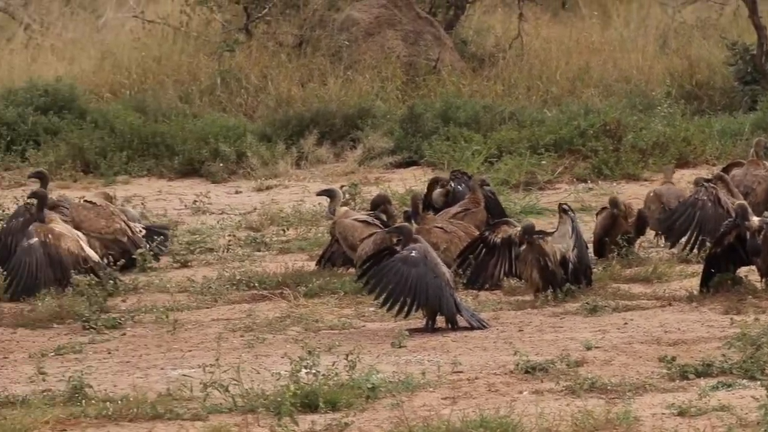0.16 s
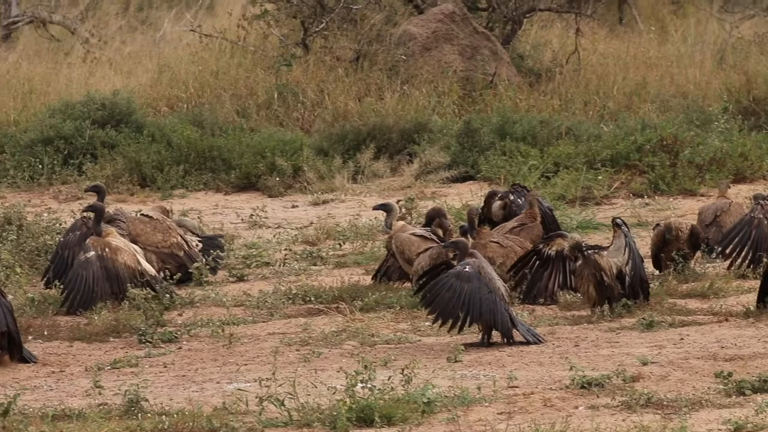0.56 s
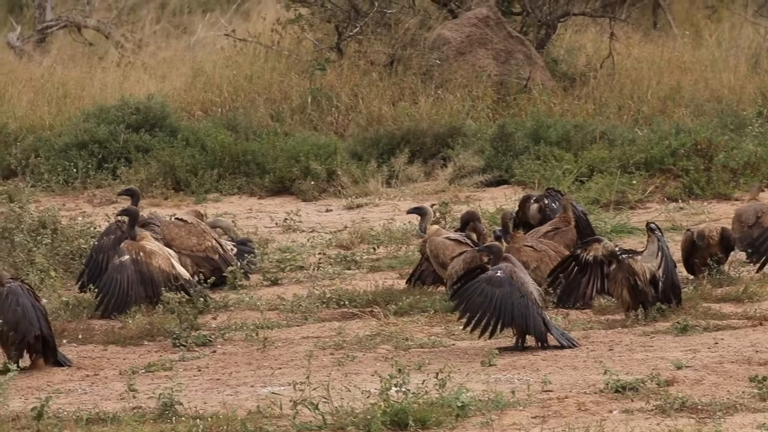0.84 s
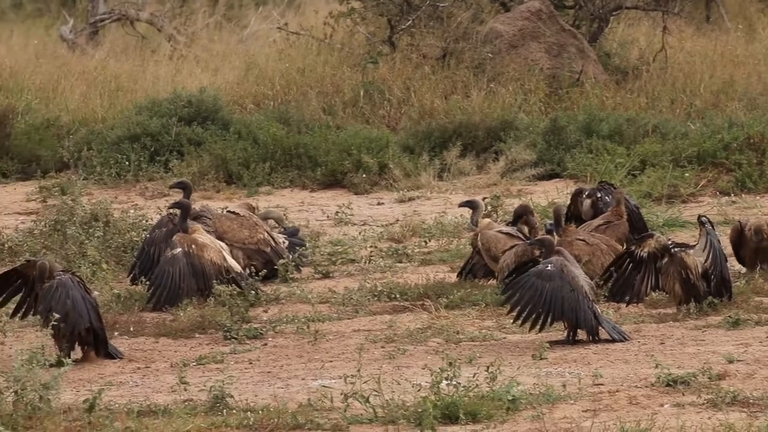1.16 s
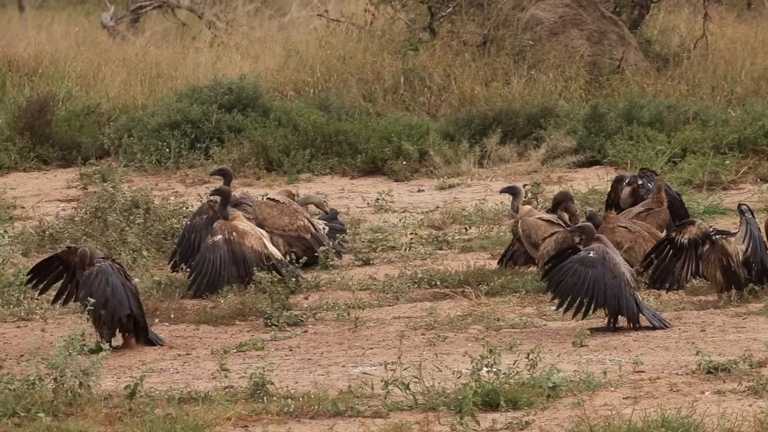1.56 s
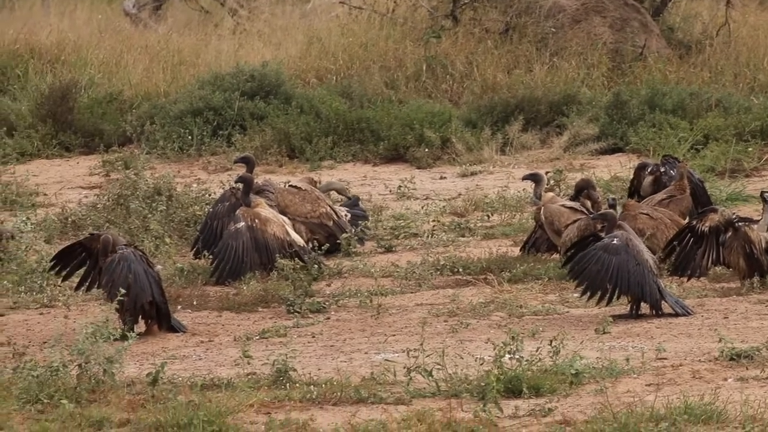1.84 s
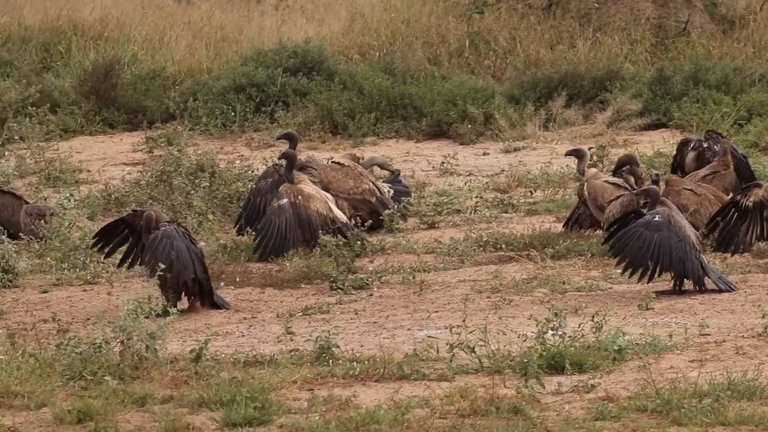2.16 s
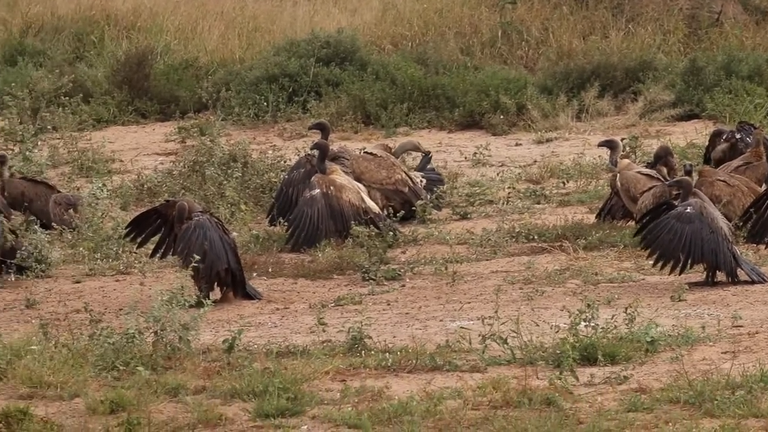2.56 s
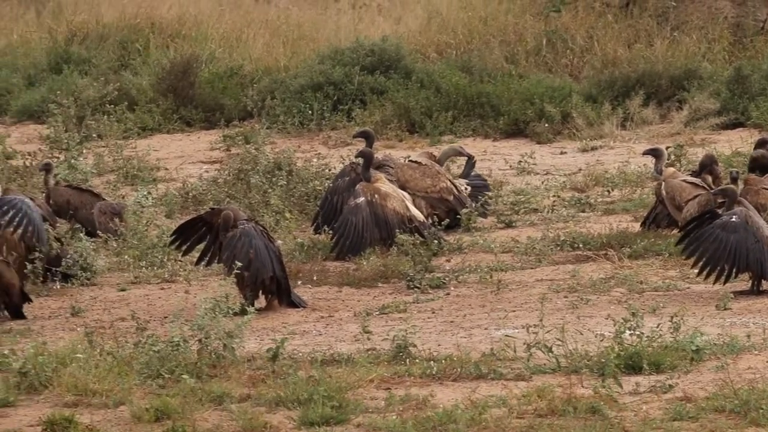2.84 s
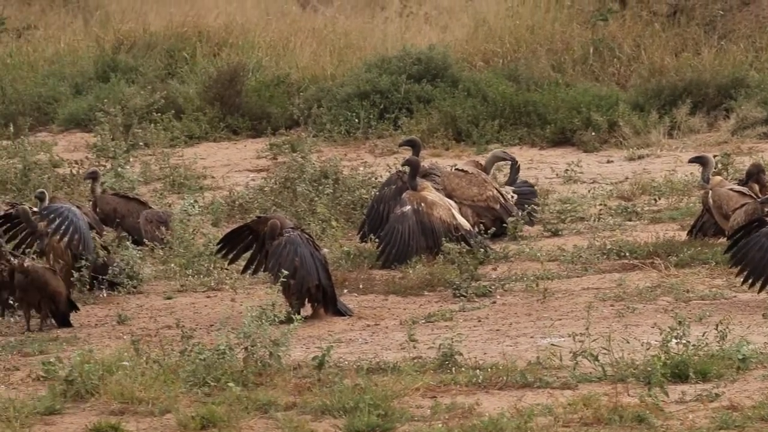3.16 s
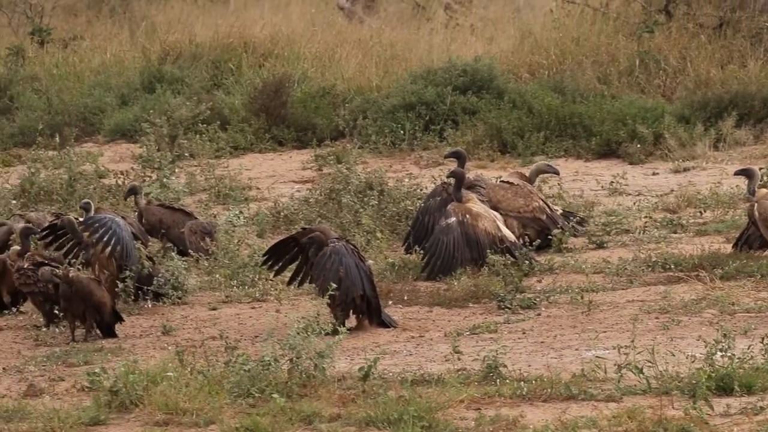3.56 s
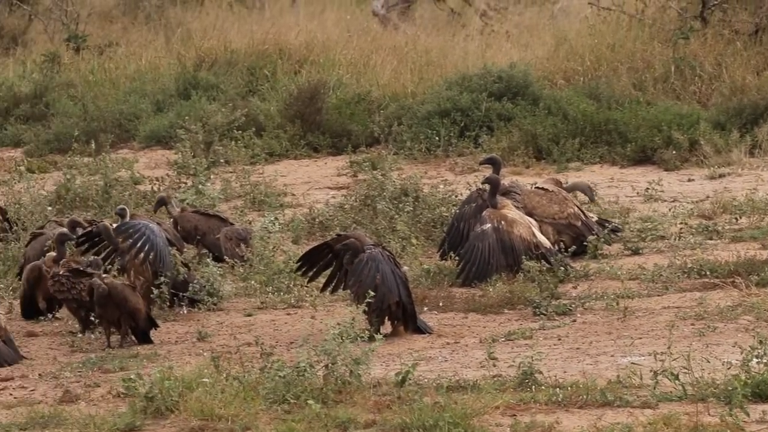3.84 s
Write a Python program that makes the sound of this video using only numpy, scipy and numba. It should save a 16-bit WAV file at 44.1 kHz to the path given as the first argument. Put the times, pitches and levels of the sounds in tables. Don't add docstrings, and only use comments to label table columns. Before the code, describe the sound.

Raspy bird hisses on dry open ground, weak in the first half and louder in the second, separated by small squawks and whistles. Faint air and low hum behind; a gust and tick strike the stereo microphone.

```python
import sys
import numpy as np
from scipy import signal
from scipy.fft import rfft, irfft
from scipy.io import wavfile
from scipy.ndimage import uniform_filter1d
from numba import njit

SR = 44100
rng = np.random.default_rng(int(sys.argv[2]) if len(sys.argv) > 2 else 0)


def gain_from_db(level_db):
    decades = np.asarray(level_db, float) / 20
    return 10 ** decades


def unload_audio(sound):
    columns = np.transpose(np.atleast_2d(sound))
    steps = np.round(np.clip(columns, -1, 1) * 32767)
    wavfile.write(sys.argv[1], SR, steps.astype(np.int16))


N = 176400
T = np.arange(N) / SR
FREQ = np.maximum(np.fft.rfftfreq(N, 1 / SR), 1.)


def read(table):
    table = np.array(table, float)
    return np.interp(np.log(FREQ), np.log(table[:, 0]), table[:, 1])


def unit(x):
    return x / np.sqrt(np.mean(x ** 2))


@njit
def svf(x, hz, width):
    y, band_state, low_state = np.empty(len(x)), 0., 0.
    for i in range(len(x)):
        g, k = np.tan(np.pi * hz[i] / SR), width / hz[i]
        v = (band_state + g * (x[i] - low_state)) / (1 + g * (g + k))
        band_state, low_state, y[i] = 2 * v - band_state, low_state + 2 * g * v, k * v
    return y


def band(x, hz, width):
    hz = hz + np.zeros(N)
    return svf(svf(x, hz, 1.8 * width), hz, 1.8 * width)


def walk(rate):
    hold = int(SR / rate)
    steps = np.repeat(rng.standard_normal(N // hold + 1), hold)
    return unit(uniform_filter1d(uniform_filter1d(steps, hold), hold)[:N])


def noise():
    return rng.standard_normal(N)


def gate(start, length, fade):
    return np.sin(np.pi / 2 * np.clip(np.minimum(T - start, start + length - T) / fade, 0, 1)) ** 2


# (frequency [Hz], level [dB])
SHADING = [(200, 3.5), (400, 6.5), (700, 6.5), (1400, -3.5), (2300, 2), (4400, 4.5), (8800, 3.5),
           (12000, 7)]
# (frequency [Hz], lead [rad])
PHASE_LEAD = [(300, 0.036), (1210, 0.3), (1810, 1.3), (2580, 0.79), (3450, 1.83), (4050, 1.52),
              (8800, 2.38), (12000, 6.6)]


def ports(a, b, likeness, strength=1):
    top_hz = 15300
    coherence = np.clip(read(likeness), 0, 1)
    treble_loss = 1 + (FREQ / top_hz) ** 60
    mid = rfft(a) * np.sqrt((1 + coherence) / 2) / treble_loss
    side = rfft(b) * np.sqrt((1 - coherence) / 2) / treble_loss
    tilt = gain_from_db(strength * read(SHADING) / 2) * np.exp(.5j * read(PHASE_LEAD))
    return np.array([irfft((mid + side) * tilt, N), irfft((mid - side) / tilt, N)])


# (frequency [Hz], level per Hz [dB])
BUSH_COLOUR = [(15, -62), (25, -12), (469, -9.5), (804, -13.5), (997, -13.5), (1300, -18), (11200, -26.5),
               (14300, -32), (15500, -28.5)]


def bush_air():
    out, swell, colour = np.zeros((2, N)), walk(1.0), gain_from_db(read(BUSH_COLOUR))
    for hz in 30 * 2 ** np.arange(0, 9.5, .5):
        window = np.cos(np.pi / 2 * np.clip(2 * np.log2(FREQ / hz), -1, 1))
        gusty = 1 / (1 + hz / 150)
        for path in out:
            flicker = gain_from_db((1.0 + 2 * gusty) * walk(10) + 0.41 * swell)
            path += flicker * irfft(rfft(noise()) * window * colour, N)
    return unit(out) * gain_from_db(-63.5)


# (frequency [Hz], width [Hz], level [dB])
DRONE = [(290, 30, -73.5), (433.7, 35, -71.5), (170, 30, -77)]


def drone():
    out = np.zeros(N)
    for hz, width, db in DRONE:
        swell_db = 5.3 * (hz < 200) * gate(1.0, 0.93, 0.074)
        out += gain_from_db(db + 2 * walk(7.73) + swell_db) * unit(band(noise(), hz, width))
    return out


def ring(start, hz, t60):
    t = np.maximum(T - start, 0)
    return np.sin(2 * np.pi * hz * t) * np.exp(-np.log(1000) * t / t60)


# (time [s], level [dB], frequency [Hz])
THUMP_EVENTS = [
    (.53, -62, 130),
    (.698, -57.5, 174),
    (3.036, -59.5, 162),
    (3.133, -58.5, 177),
    (3.529, -59.5, 129),
    (3.94, -60, 682),
    (3.74, -70, 170),
]


def thumps():
    return sum(gain_from_db(db + 8.0) * ring(s, hz, 0.068) for s, db, hz in THUMP_EVENTS)


# (time [s], peak level [dB], sign of pressure [+-1], length [s])
LEFT_PUFFS = [
    (2.284, -48, 1, .018),
    (2.31, -52, 1, .022),
    (2.347, -47, -1, 0.026),
    (2.375, -45, -1, 0.03),
]
# (time [s], peak level [dB], sign of pressure [+-1], length [s])
RIGHT_PUFFS = [
    (2.366, -52, -1, 0.029),
    (2.379, -29.5, 1, 0.016),
    (2.401, -33.5, 1, 0.018),
    (2.42, -32, 1, 0.0148),
    (2.436, -40, 1, 0.013),
    (2.447, -34, 1, 0.01),
    (2.457, -49, 1, 0.028),
]


def gust(puffs):
    out = np.zeros(N)
    for s, db, sign, length in puffs:
        u = np.clip((T - s) / length, 0, 1)
        out += np.sign(sign) * gain_from_db(db) * np.sin(2 * np.pi * u ** 0.63) * (1 - 0.42 * u)
    return signal.sosfilt(signal.butter(4, 260, fs=SR, output="sos"), out)


# (frequency [Hz], level [dB], decay t60 [s])
TICK_MODES = [(450, -15, .012), (1170, -1, .005), (3700, 3.5, .003), (6200, 0, .002), (7700, -2, .0018),
              (9700, 1, .002), (12500, 1, .0017), (15000, -1, .0013)]


def tick():
    start_s, bounce_s, top_hz = 2.5763, .00011, 16200
    near = np.zeros(N)
    for k, (hz, db, t60) in enumerate(TICK_MODES):
        polarity = (-1) ** max(k - 3, 0)
        near += polarity * gain_from_db(db) * ring(start_s + (hz > 5000) * bounce_s, hz, t60)
    near = signal.sosfiltfilt(signal.ellip(6, .2, 30, top_hz, fs=SR, output="sos"), near)
    near *= gain_from_db(-12) / np.abs(near).max()
    far = np.roll(near - svf(near, np.full(N, 1000.), 6000), 8)
    return np.array([near, gain_from_db(-29) * far])


# (time [s], length [s], level [dB], first pitch [Hz], last pitch [Hz])
WHISTLE_EVENTS = [
    (1.76, .065, -62, 2270, 2300),
    (1.85, .13, -64, 2110, 2135),
    (1.975, .065, -75, 2480, 2620),
    (2.03, .045, -69, 2620, 2550),
    (2.064, .03, -64, 2520, 2250),
    (2.086, .06, -66, 2120, 2110),
    (1.17, .095, -65, 2400, 2280),
    (1.825, .035, -67, 2800, 2800),
]


def whistles():
    out = np.zeros(N)
    for s, length, db, first_hz, last_hz in WHISTLE_EVENTS:
        glide = np.interp(T, [s, s + length], [first_hz, last_hz])
        waver = 1 + 0.00594 * walk(150) + .003 * walk(30)
        phase = 2 * np.pi * np.cumsum(glide * waver) / SR
        tone = np.sin(phase) + gain_from_db(-6) * (length > .12) * np.sin(2 * phase)
        out += gain_from_db(db - 1 + 2 * walk(110) + walk(35)) * gate(s, length, .014) * tone
    return out


# (time [s], length [s], level [dB], pitch [Hz], roughness [0-1])
SQUAWK_EVENTS = [
    (1.704, 0.087, -60.5, 1420, .35),
    (1.803, 0.035, -57, 1350, 0.22),
    (2.109, .008, -66, 2000, 0.1),
    (0.051, 0.056, -64.5, 1000, 0.67),
    (1.4, .02, -69, 1100, 0.31),
]
SQUAWK_PARTIALS = [-2, 1, -14, -22]


def squawks():
    out = np.zeros(N)
    for s, length, db, hz, rough in SQUAWK_EVENTS:
        u = np.clip((T - s) / length, 0, 1)
        arch = .05 * (np.sin(np.pi * u) - .5)
        phase = 2 * np.pi * np.cumsum(hz * (1 + arch + 0.0577 * rough * walk(300))) / SR
        tone = sum(gain_from_db(d) * np.sin((k + 1) * phase) for k, d in enumerate(SQUAWK_PARTIALS))
        breath = gain_from_db(-12) * unit(band(noise(), 4700.0, 2300.0))
        breath += gain_from_db(4.5) * unit(band(noise(), 2480.0, 590.0))
        out += gain_from_db(db + 5.4 * rough * walk(200)) * gate(s, length, length * 0.27) * (unit(tone) + breath)
    return out


def rasp():
    rate_hz, jitter, share = 78.6, 0.35, 0.13
    cycle = np.cumsum(rate_hz * np.exp(jitter * walk(rate_hz))) / SR
    size = gain_from_db(2 * rng.standard_normal(N // 50))[cycle.astype(int)]
    return unit(1 - share + share * 2 * size * np.sin(np.pi * cycle) ** 2)


# (frequency [Hz], level per Hz [dB])
AIR_COLOUR = [(1900, -37), (2700, 4.5), (3350, -2.5), (4600, -8.5), (8000, -11.5), (10800, -21.5),
              (14500, -36), (15500, -49)]


def air_patches(top_db, palate_db):
    patches = []
    for hz in 1800 * 2 ** (np.arange(11) / 3):
        window = np.cos(np.pi / 2 * np.clip(3 * np.log2(FREQ / hz), -1, 1)) ** 2
        gain_db = 2.5 * walk(16) + (hz > 9000) * top_db + (4400 < hz < 7000) * palate_db
        patches.append((gain_from_db(gain_db), window))
    return patches


# (frequency [Hz], width [Hz], level [dB])
THROAT_MODES = [(1800, 500, 1), (2343, 406, 1.5)]
MOUTH_LEVELS = [3, 1.5, 6, 1.5]
# (top end [dB], upper resonance [dB], its centre [Hz], mouth width [Hz], palate hiss [dB])
BIRD_VOICES = [(10.5, -8.5, 3770, 263, 3.5), (0.5, -11, 3740, 175, 3), (-2.5, -9, 4020, 195, 0.5),
               (1, -17, 2400, 290, 0.5)]
# (time [s], effort [dB], brightness [dB], mouth resonance [Hz], windpipe resonance [dB])
HISS_1 = [
    (0, -54.5, -8.5, 1950, 0),
    (.09, -53, -9.5, 2060, 6.5),
    (.2, -48.5, -8.5, 2075, -2),
    (.34, -52, -7.5, 2060, -0.5),
    (.5, -56, -9.5, 1800, 0),
    (1.027, -57.5, -15, 1910, 1),
    (1.13, -61.5, -15.5, 1800, 1),
    (1.68, -62.5, -10, 1800, -0.5),
    (1.95, -72.5, -4, 2070, 5),
]
HISS_2 = [
    (2.135, -53, -14, 1860, 0),
    (2.16, -52, -10.5, 1690, 0.79),
    (2.23, -46.5, -11.5, 1760, -1.2),
    (2.32, -43, -8.5, 1700, -0.61),
    (2.365, -46, -11.5, 1890, -0.66),
    (2.385, -51.5, -11.5, 1760, 0),
    (2.41, -45.5, -13.5, 1700, 0),
    (2.48, -45, -13, 1890, -0.85),
    (2.554, -49.5, -4.5, 1750, -2),
]
HISS_3 = [
    (2.558, -50, -10, 2250, -2),
    (2.615, -43, -12, 2170, -8),
    (2.68, -45.5, -9, 1780, 3),
    (2.76, -47, -10, 1560, 5),
    (2.86, -47, -11, 1800, 5),
    (3.0, -47, -9, 1900, 4),
    (3.14, -50.5, -6, 2000, 1),
    (3.27, -60.5, -12, 1930, -1),
    (3.47, -59.5, -14, 2040, 3),
]
HISS_4 = [
    (3.447, -65, -5, 1950, 0),
    (3.5, -54.5, -7.5, 1850, 2),
    (3.56, -54, -7.5, 1900, 0.5),
    (3.62, -48, -9.5, 2110, -1),
    (3.7, -50.5, -13, 2150, -6.5),
    (3.92, -55, -13, 2150, -7),
    (4, -64, -3.5, 1950, 6),
]


def hiss(rows, mouth_db, bird):
    top_db, upper_db, upper_hz, mouth_width, palate_db = bird
    s, *columns = np.array(rows, float).T
    effort_db, bright_db, mouth_hz, pipe_db = (np.interp(T, s, v) for v in columns)
    flap = rasp()
    *throat_swells, upper_swell, mouth_swell, pipe_swell = [gain_from_db(0.8 * walk(r)) for r in (19, 21, 6.6, 14, 22)]
    fade_s = 0.015
    shape = gate(s[0] - fade_s, s[-1] - s[0] + 2 * fade_s, 2 * fade_s) * gain_from_db(effort_db)
    treble_notch_db = -14 * np.exp(-((FREQ - 8700) / 350) ** 2)
    colour = gain_from_db(read(AIR_COLOUR) + treble_notch_db)
    top_db = top_db + 1.0 * (effort_db - effort_db.max())
    upper_hz = upper_hz * np.exp(.06 * walk(10))
    patches = air_patches(top_db, palate_db)
    edge = signal.butter(6, 1337, "high", fs=SR, output="sos")
    out = np.zeros((2, N))
    for path in out:
        jet = flap * noise()
        low = np.zeros(N)
        for k, (hz, width, db) in enumerate(THROAT_MODES):
            throat_hz = hz * (mouth_hz / 1950) ** .12
            low += (-1) ** k * gain_from_db(db) * throat_swells[k] * unit(band(jet, throat_hz, width))
        moving_mouth = band(jet, mouth_hz * (1 + 0.034 * walk(20)), mouth_width)
        low += gain_from_db(mouth_db) * mouth_swell * unit(moving_mouth)
        low = unit(low) - gain_from_db(pipe_db - 6.5) * pipe_swell * unit(band(jet, 1431, 270))
        air = unit(sum(gain * irfft(rfft(jet) * colour * window, N) for gain, window in patches))
        air += gain_from_db(upper_db) * upper_swell * unit(band(jet, upper_hz, 550))
        path += shape * (signal.sosfilt(edge, low) + gain_from_db(bright_db + 3.5) * air)
    return out


def hisses():
    hiss_tables = (HISS_1, HISS_2, HISS_3, HISS_4)
    return sum(hiss(*voice) for voice in zip(hiss_tables, MOUTH_LEVELS, BIRD_VOICES))


# (frequency [Hz], likeness [0-1])
BUSH_COHERENCE = [(40, 0.77), (130, 0.31), (300, 0.37), (700, 0.72), (2000, 0.11), (6000, 0.069),
                  (9000, 0.034)]
# (frequency [Hz], likeness [0-1])
BIRD_COHERENCE = [(1000, 0.84), (2500, 0.93), (4000, 0.69), (7000, 0.68), (9000, 0.88), (15000, 0.23)]


def scene():
    background = bush_air()
    background[0] += drone() + thumps()
    cries = whistles() + squawks()
    birds = hisses() + np.array([cries, np.roll(cries, 300)])
    out = gain_from_db(1.14) * ports(*background, BUSH_COHERENCE, strength=0.45)
    out += np.array([gust(LEFT_PUFFS), gust(RIGHT_PUFFS)]) + tick()
    return out + gain_from_db(1.5) * ports(*birds, BIRD_COHERENCE)


def band_limit(x):
    return signal.sosfilt(signal.butter(12, 16610, fs=SR, output="sos"), x)


def record(dry):
    return band_limit(dry)


dry = scene()
out = record(dry)
unload_audio(out)
```